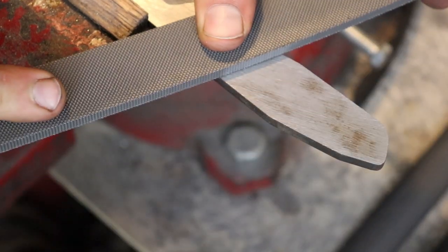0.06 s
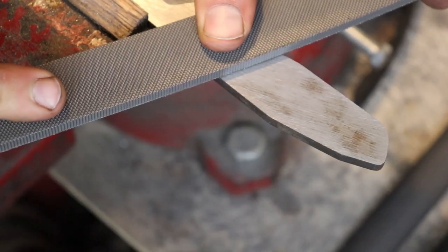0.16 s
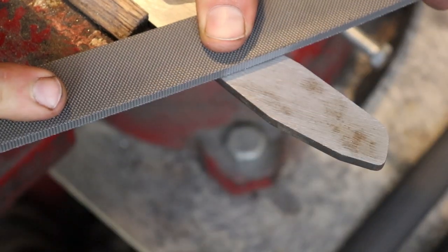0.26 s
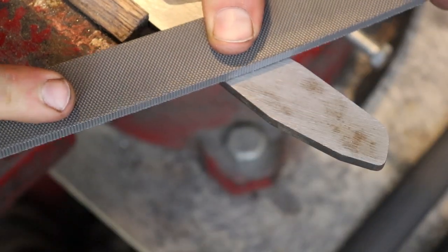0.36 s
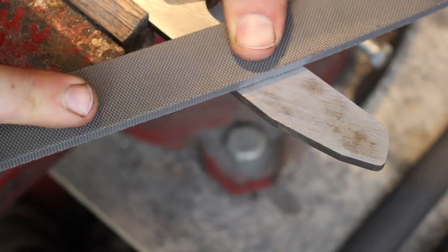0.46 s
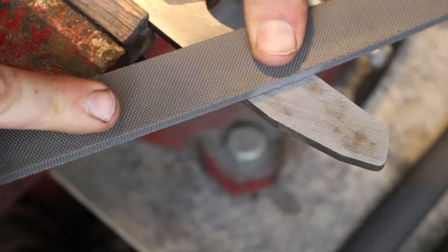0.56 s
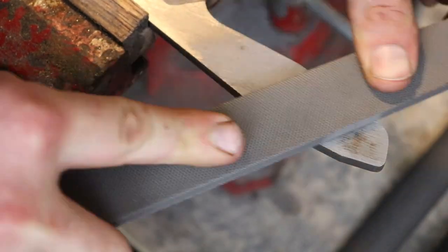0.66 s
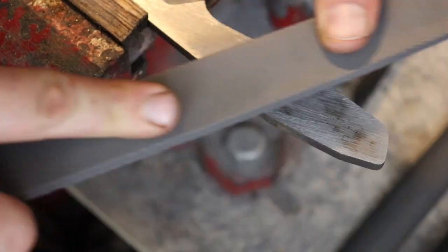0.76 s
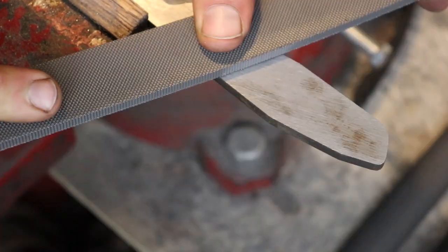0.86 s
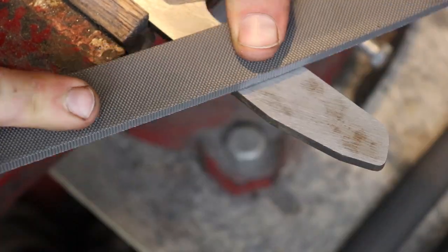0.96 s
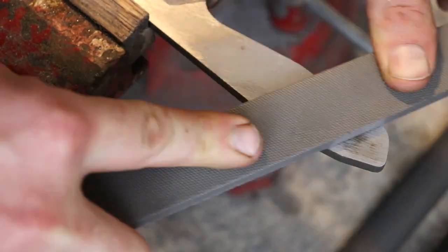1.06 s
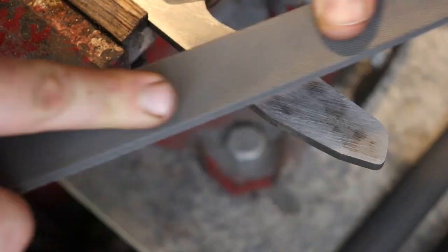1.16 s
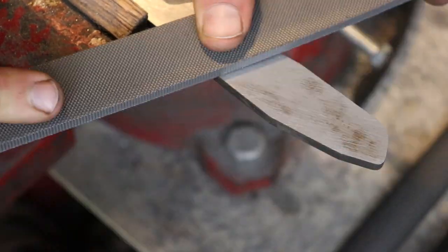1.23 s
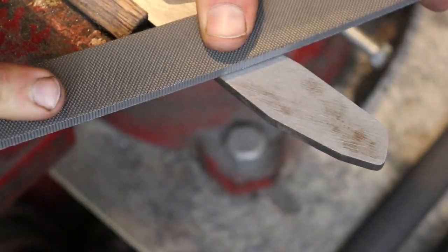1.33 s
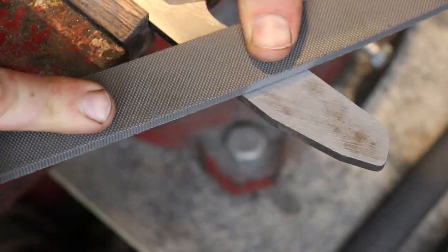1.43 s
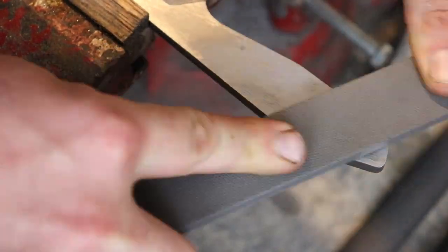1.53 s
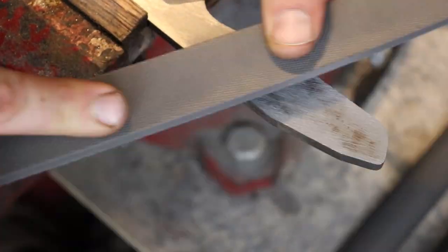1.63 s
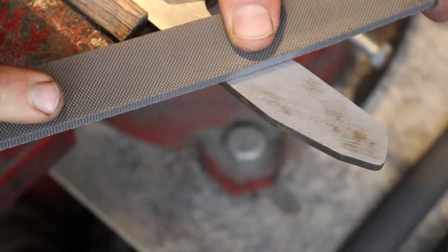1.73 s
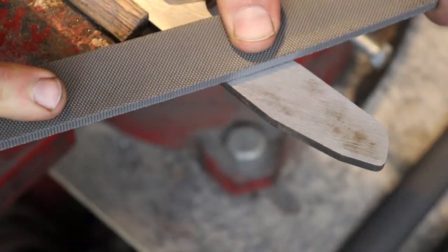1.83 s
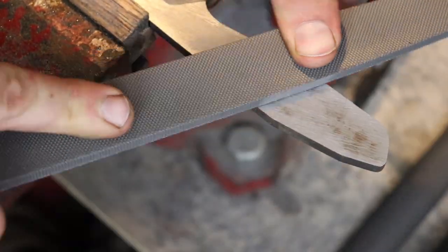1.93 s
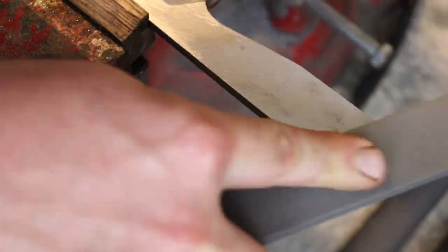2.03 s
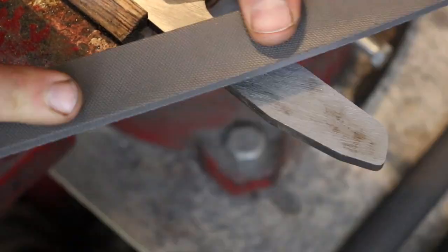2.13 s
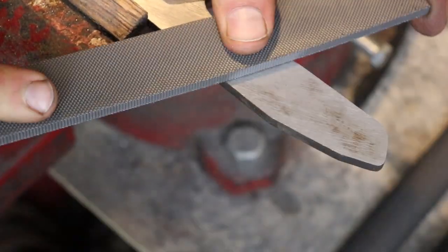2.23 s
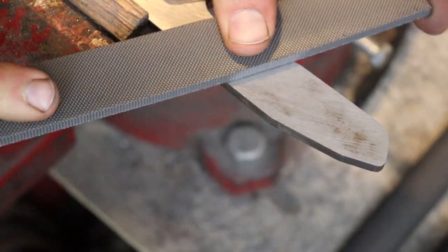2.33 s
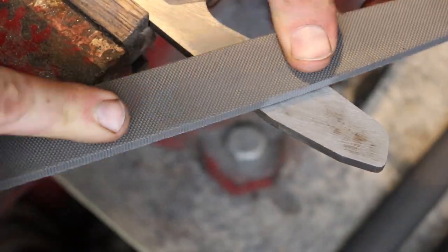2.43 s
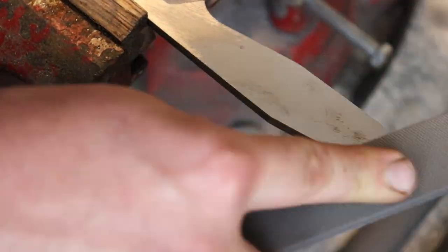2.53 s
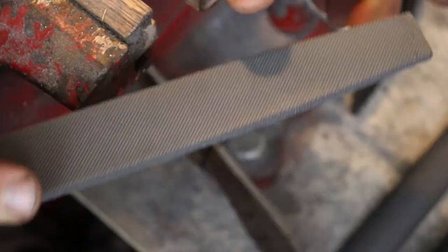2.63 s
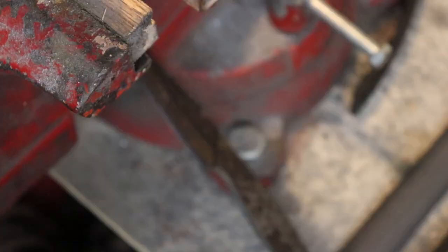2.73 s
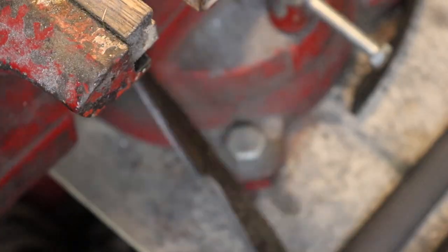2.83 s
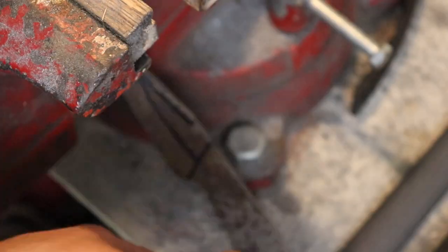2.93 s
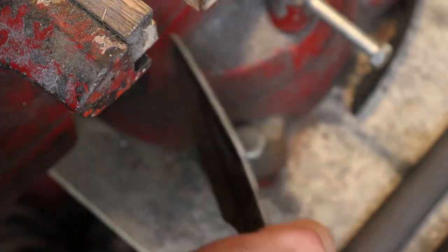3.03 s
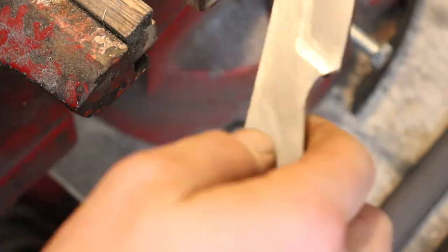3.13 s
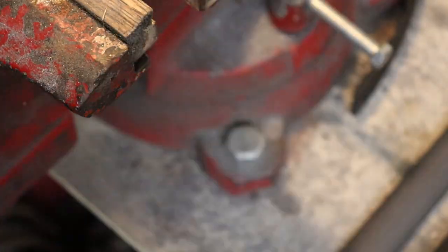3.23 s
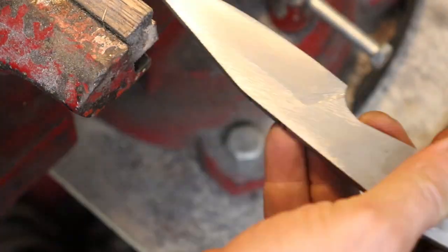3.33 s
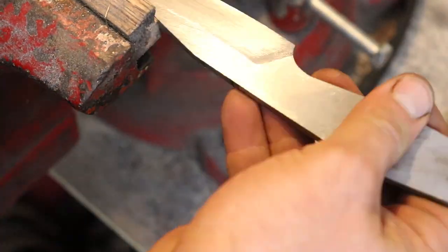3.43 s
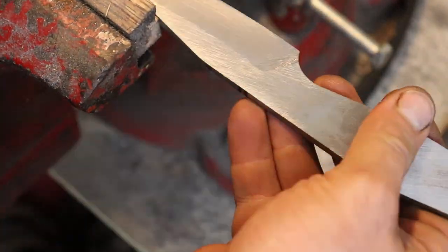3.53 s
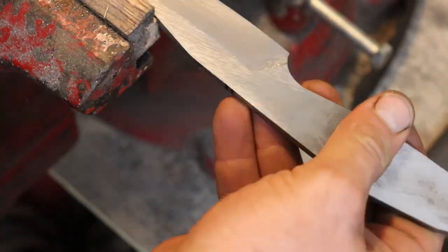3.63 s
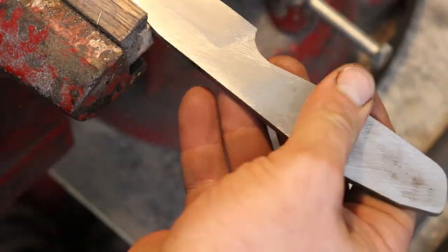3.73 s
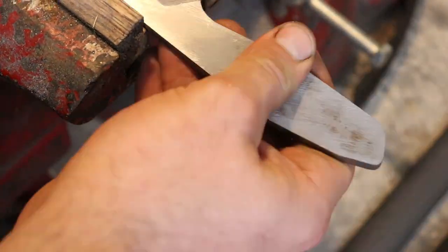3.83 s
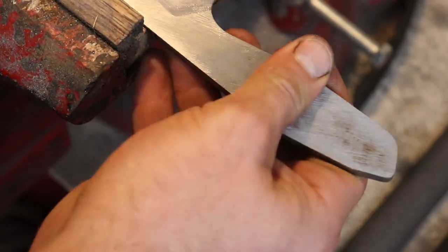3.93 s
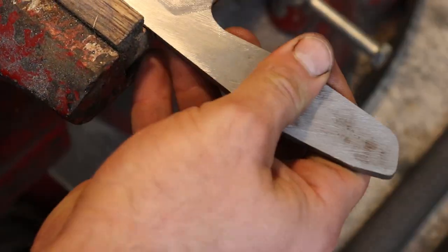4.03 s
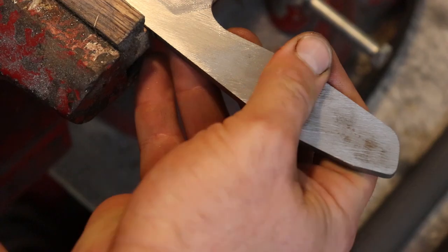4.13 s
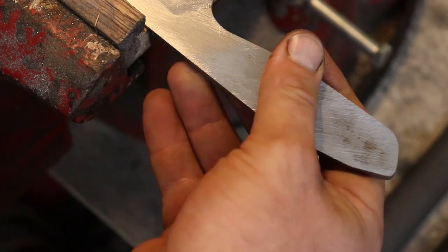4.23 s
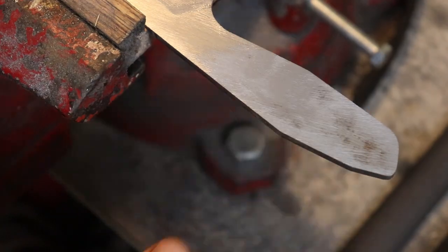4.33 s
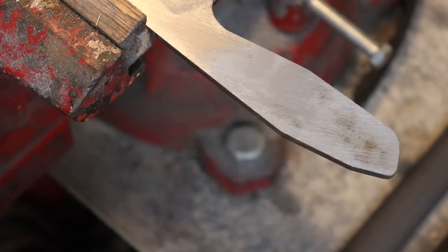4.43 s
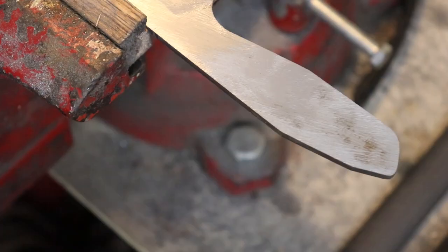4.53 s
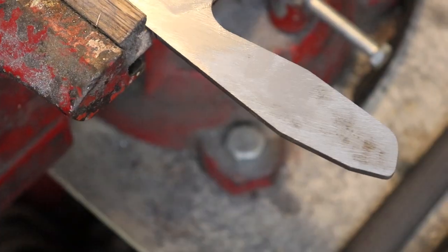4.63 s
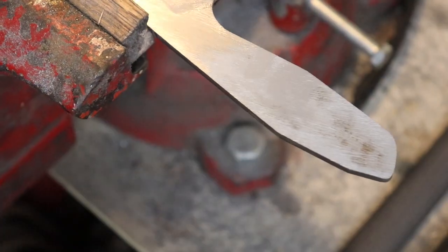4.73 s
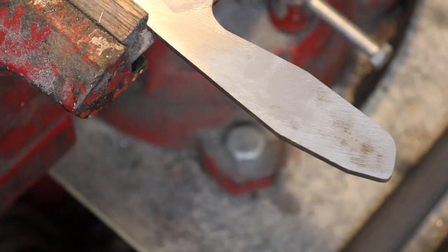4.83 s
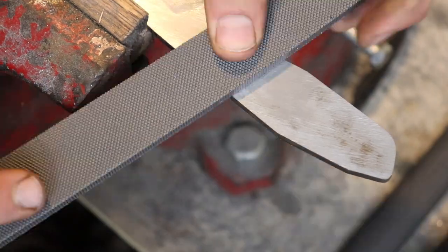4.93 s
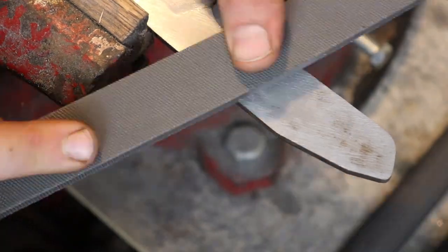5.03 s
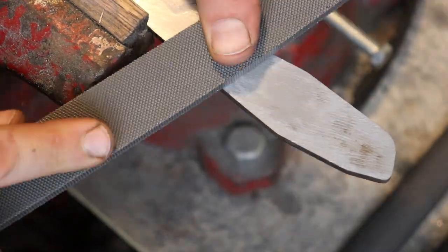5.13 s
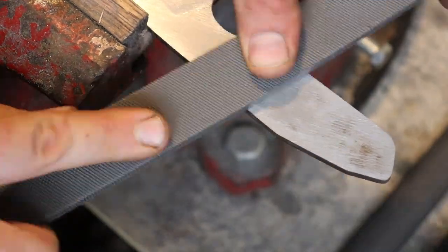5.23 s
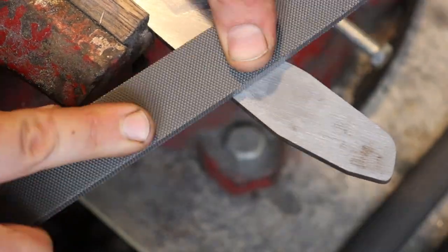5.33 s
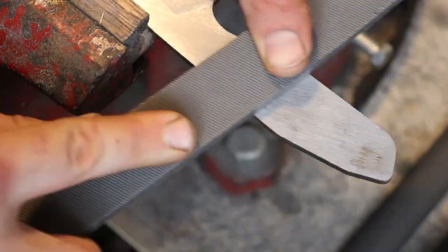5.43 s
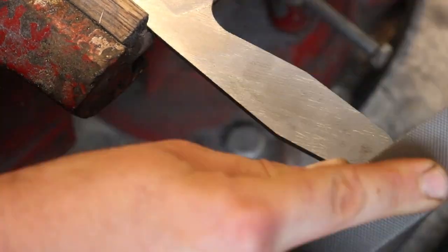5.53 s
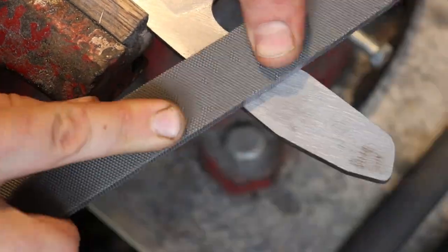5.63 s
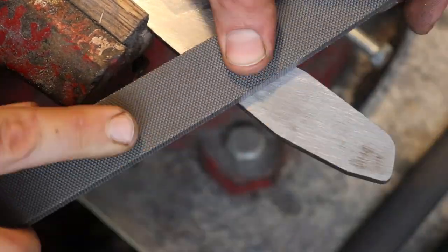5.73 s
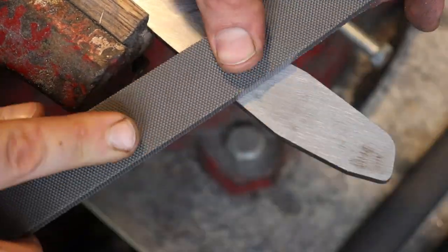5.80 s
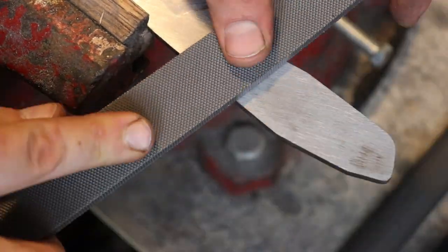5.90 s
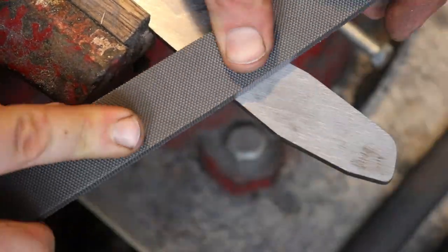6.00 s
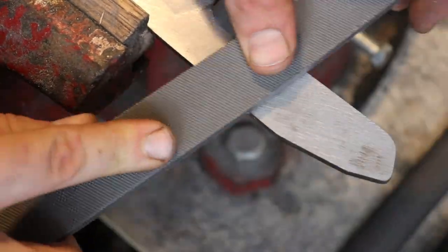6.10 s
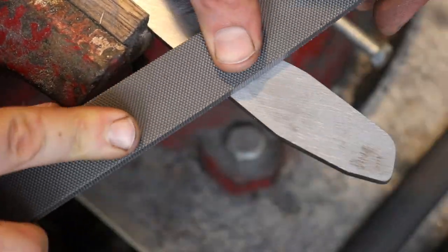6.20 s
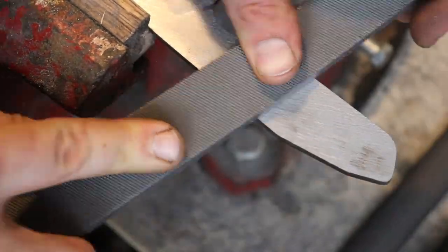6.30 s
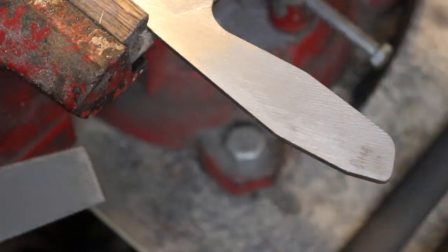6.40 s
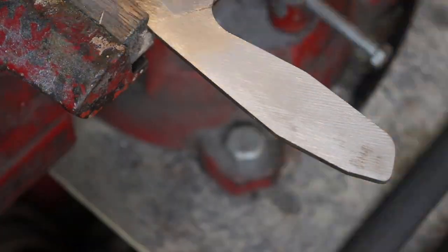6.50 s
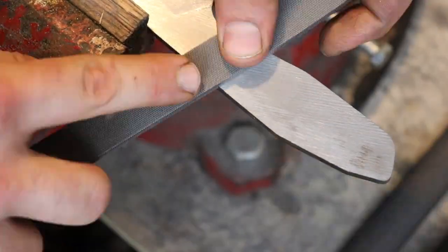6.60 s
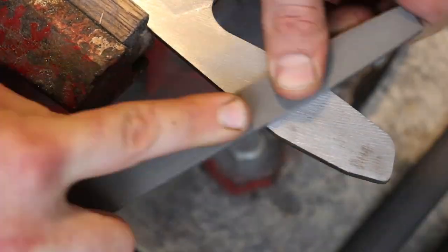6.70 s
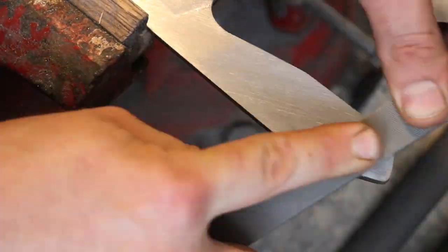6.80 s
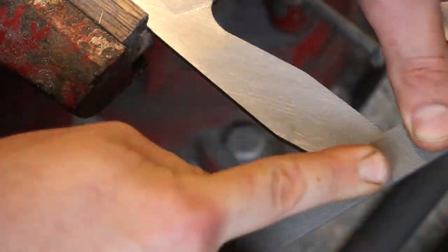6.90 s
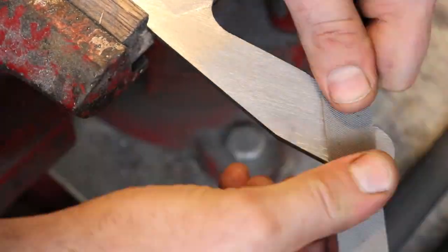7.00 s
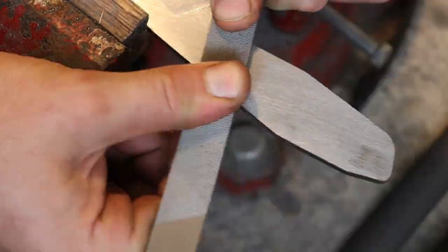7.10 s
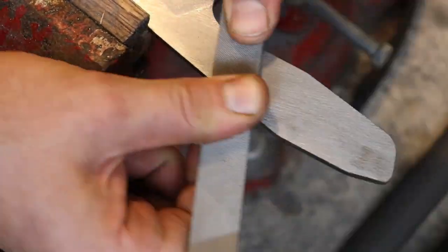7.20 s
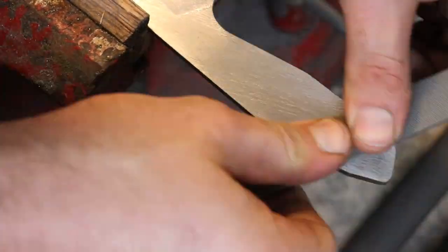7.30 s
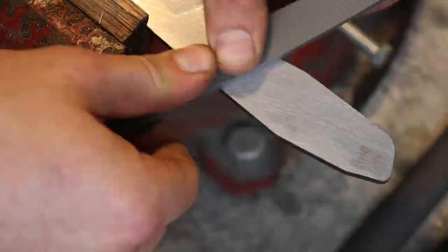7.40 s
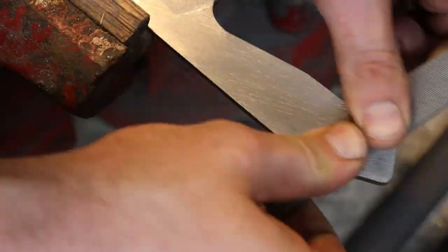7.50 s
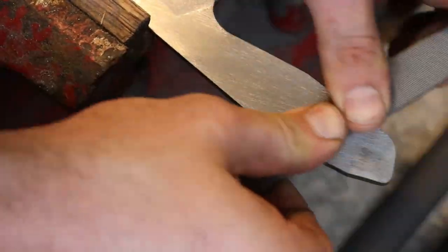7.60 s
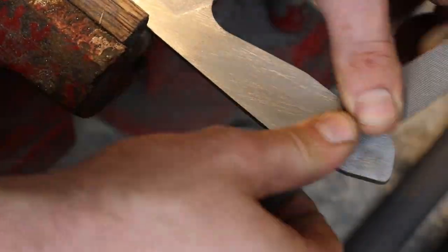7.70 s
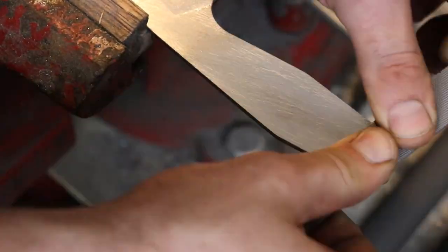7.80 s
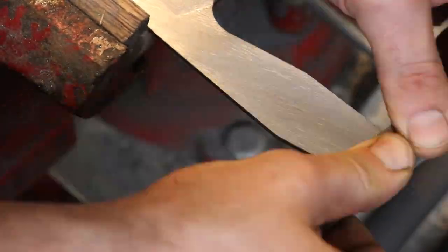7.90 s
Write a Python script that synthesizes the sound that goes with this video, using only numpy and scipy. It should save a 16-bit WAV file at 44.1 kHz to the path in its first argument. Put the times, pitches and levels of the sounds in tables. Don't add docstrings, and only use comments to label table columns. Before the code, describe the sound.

Close stereo pickup of time-lapse metal filing, with short room reflections and very soft background hush. A rasping stroke at ordinary pace jumps to brisk, ringing scrapes with set-down taps. Loud steel knocks and scrapes mark the blade being turned and seated in the vise, much louder than the filing. Finally the strokes become racing, thin, high-pitched chirps, first scattered, then in fluttering runs until the end.

```python
import sys
import numpy as np
from scipy import signal
from scipy.fft import rfft, irfft, next_fast_len
from scipy.io import wavfile
from scipy.ndimage import uniform_filter1d

SR = 44100
rng = np.random.default_rng(int(sys.argv[2]) if len(sys.argv) > 2 else 0)


def persist_wave(psi):
    counts = np.round(np.clip(psi, -1, 1) * 32767).astype(np.int16)
    wavfile.write(sys.argv[1], SR, np.atleast_2d(counts).T)


def elevation(decibels):
    levels = np.asarray(decibels, float)
    return 10 ** (levels / 20)


N = 350595
TIME = np.arange(N) / SR
QUICK_S, RACING_S = 0.698, 4.8

# (frequency [Hz], width [Hz], level over the colour [dB])
LOOSE_STEEL = [
    [(300, -38.5), (650, -15.5), (1100, -13.5), (1800, -9), (3500, -7.5), (6000, -9), (11000, -11), (16000, -15.5)],
    [(1850, 130, 2), (3120, 130, 3), (5650, 83, 4), (14000, 300, 1.5)],
]
RACING_STEEL = [
    [(530, -50), (900, -44), (1800, -26), (2330, -36.5), (3000, -22), (3800, -28.5), (6300, -21), (8300, -14), (9400, -17.5), (16000, -12.5)],
    [(1380, 58, 7), (2655, 150, 8.5), (3250, 246, 10.5), (4500, 450, 0.8), (6520, 56, -2.5), (8940, 240, 6.5), (7700, 280, -8.5), (9800, 220, 14), (10400, 265, 13), (11000, 80, 3.5), (12100, 140, 1), (12000, 120, -3), (13000, 490, 3)],
]


def strokes():
    # (frequency [Hz], width [Hz], level over the colour [dB])
    natural_steel = [
        [(59, -44), (90, -9), (125, 4.5), (175, -13), (289, -8), (350, -3), (442, -19.5), (513, -9), (1280, -18.5), (1580, -13), (8110, -26.5), (11000, -27.5), (12300, -36), (16000, -39)],
        [(347, 135, 11.5), (501, 15, 13.5), (4970, 240, 3), (5500, 200, -8), (8170, 460, 5), (2030, 150, -6), (3500, 160, 2)],
    ]
    quick_steel = [
        [(180, -69.5), (300, -18), (470, -17), (624, -6), (946, -16), (1750, -6), (2250, -10.5), (2570, -10.5), (4300, -16), (6200, -15), (9710, -13.5), (16000, -12.5)],
        [(636, 39, 6.5), (2610, 160, 2), (3200, 140, -1), (7660, 240, 0), (9800, 500, 2)],
    ]
    # (file touches [s], teeth bite [s], file lifts [s], bite level [dB], crest level [dB])
    full_strokes = [
        (0.441, 0.484, 0.677, -46, -45.5),
        (.6, 0.69, 0.786, -46, -42.5),
    ]
    # (time [s], effort [dB], sizzle against the rasp [dB])
    quick_pushes = [
        [(1.026, -70, -14), (1.044, -46.5, -1.5), (1.09, -44, -2), (1.132, -45.5, -3), (1.166, -43, 3),
         (1.192, -41.5, 5), (1.26, -80, 2)],
        [(1.44, -70, -17), (1.46, -52, -4), (1.524, -51.5, -5), (1.538, -44.5, -4.5), (1.636, -42.5, 4),
         (1.666, -45, 1), (1.72, -83, -3)],
        [(1.93, -85, -11), (1.944, -62.5, -7), (1.982, -43, -2), (2.01, -59, -8), (2.024, -45, 0.5),
         (2.128, -40, 1.5), (2.192, -75, 2.5), (2.2, -74, 1.5)],
        [(2.42, -82, -20), (2.442, -53.5, -3), (2.516, -49, -2.5), (2.554, -40.5, 0.5), (2.588, -40, 2),
         (2.616, -41, 1.5), (2.63, -62, 4.5), (2.646, -54, -2.5)],
    ]
    snag_scrapes = [
        (1.016, -54, 6.4, 4, -7),
    ]
    slide_scrapes = [(2.708, -28.5, 1.4, 26, 1), (2.746, -27, 23, 15, -4), (2.833, -52, 15, 18, 14),
                     (2.916, -57, 2.62, 14, -27), (2.947, -47, 34, 7.3, -14.5), (3.03, -47.5, 19, 37, -3),
                     (3.079, -29, 1.3, 3.1, -15), (3.101, -30, 6.8, 15.3, -23), (3.157, -67, 7.3, 13, 14),
                     (3.211, -66.5, 1.5, 23, 14), (3.24, -65, 27, 21, 15.5)]
    seating_scrapes = [(3.66, -40.5, 2.9, 5.1, -11), (3.69, -61.5, 49, 390, -4), (3.845, -75, 17, 3, -32),
                       (4.022, -81, 7.4, 57, -24), (4.132, -56, 4.9, 23, -3), (4.18, -51, 15, 12.5, -16),
                       (4.532, -64.5, 8.4, 23, -13.5), (4.548, -52.5, 1.9, 29, 1),
                       (4.5985, -66, 1.3, 15, 27.5), (4.611, -67, 4.7, 20, 26), (4.668, -58, 6.4, 9.9, -18),
                       (4.705, -71.5, 6.8, 30, 12)]
    natural_sizzle, natural_drone = (-6.5, -8.5, -10.5, 24), (-4.5, -11.5, -3.5, 5)
    quick_sizzle, quick_drone = (-3.5, -4, 3.5, -3), (-12.5, -13, -12.5, -49)
    push_drone_db = -13.5

    def layers(rasp, low_hz, mid_hz, top_hz=5960):
        return [band(rasp, mid_hz, 5000), band(rasp, top_hz, 17000), band(rasp, low_hz, mid_hz)]

    first = teeth(natural_steel, per_s=4000, spread_db=4.0, t60=0.042, same=0.81, spot_s=0.054)
    quick = teeth(quick_steel, per_s=10000, spread_db=3.5, t60=0.081, same=0.75, spot_s=0.04)
    loose = teeth(LOOSE_STEEL, per_s=5000, spread_db=3, t60=0.04, same=0.6, spot_s=0.05)

    slow_moves = [stroke(*full_strokes[0], natural_sizzle, natural_drone)]
    quick_moves = [stroke(*row, quick_sizzle, quick_drone) for row in full_strokes[1:]]
    quick_moves += [[(*row, push_drone_db) for row in push] for push in quick_pushes]
    quick_moves += scrapes(snag_scrapes, drone_db=-31)
    loose_moves = scrapes(slide_scrapes, drone_db=-68.5) + scrapes(seating_scrapes, drone_db=0)

    slow = played(slow_moves, layers(first, 76, 500))
    brisk = played(quick_moves, layers(quick, 420, 1290))
    handled = played(loose_moves, layers(loose, 460, 1200, 5300))
    return np.where(TIME < QUICK_S, slow, brisk) + handled


def stroke(touch, bite, lift, bite_db, crest_db, sizzle, drone):
    touch_s, bite_s, hold_s, lift_s = 0.0082, 0.0044, 0.011, 0.041
    silent_db, touch_db = -81, -58.5
    s = [touch - touch_s, touch + touch_s, bite - bite_s, bite,
         lift, lift + hold_s, lift + lift_s, lift + 2 * lift_s]
    db = [silent_db, touch_db, touch_db + 9, bite_db,
          crest_db, crest_db + 1.5, crest_db - 12, silent_db]
    phase = [0, 0, 0, 1, 2, 2, 3, 3]
    return np.transpose([s, db, np.take(sizzle, phase), np.take(drone, phase)])


def scrapes(rows, drone_db):
    out = []
    for s, db, rise_ms, fall_ms, sizzle in rows:
        start, end = s - rise_ms / 250, s + fall_ms / 250
        out.append([(start, db - 40, sizzle, drone_db),
                    (s, db, sizzle, drone_db),
                    (end, db - 40, sizzle, drone_db)])
    return out


def teeth(body, per_s, spread_db, t60, same, spot_s, count=6):
    catch = (rng.random(N) < per_s / SR) * rng.choice([-1, 1], N)
    catch = catch * elevation(spread_db * np.minimum(rng.exponential(1, N), 4))
    spot = (TIME / spot_s + 3 * rng.random(N)).astype(int) % count
    t = TIME[:SR // 8]
    rung = np.zeros((2, N))
    for k in range(count):
        modes = pair(len(t), same) * elevation(-60 * t / t60)
        modes = modes / np.linalg.norm(modes[0])
        rung += signal.oaconvolve((catch * (spot == k))[None], modes, axes=1)[:, :N]
    return coloured(rung + elevation(-4) * catch, steel(body))


def played(tables, layers):
    out = np.zeros((2, N))
    for rows in tables:
        s, db, *rest = np.transpose(rows)
        span = slice(round(s[0] * SR), round(s[-1] * SR))
        for layer, rel_db in zip(layers, [0, *rest]):
            out[:, span] += layer[:, span] * elevation(np.interp(TIME[span], s, db + rel_db))
    return out


def knocks():
    set_down = [
        (0.9043, -21.5, 3200, -8.5, 0.11),
        (1.307, -24.5, 3250, -9, 0.086),
        (1.7616, -16, 3160, -7.5, 0.14),
        (2.2567, -15, 3500, -4, 0.13),
    ]
    turned = [(2.6547, -2, 4250, -12, 0.049), (2.658, -2.5, 2270, -10.5, 0.16),
              (2.6957, -14.5, 9500, 4, 0.028), (2.7034, -6.5, 2430, -7, 0.021), (2.731, -17, 2900, 2, 0.04),
              (2.9125, -32.5, 2400, -23, 0.043), (2.945, -25, 2840, -8.5, 0.13),
              (2.988, -26, 2330, -30, 0.051), (3.0114, -11, 2870, -23, 0.02),
              (3.0155, -20, 3960, -25, 0.051), (3.0745, -27, 1800, -12, 0.11),
              (3.0958, -24.5, 5000, -13, 0.096), (3.153, -27, 4520, -4, 0.09)]
    clamped = [(3.4404, -19, 3920, -26, 0.13), (3.448, -15, 5300, -17, 0.12),
               (3.5919, -10, 3900, -16.5, 0.23), (3.6152, -10.5, 1700, -21.5, 0.11),
               (3.647, -12.5, 2000, -14.5, 0.077), (3.684, -21, 1930, -9.5, 0.18),
               (3.739, -33, 1910, -31, 0.25), (3.8609, -8, 5340, -4.5, 0.095),
               (4.024, -38, 1230, -14, 0.095), (4.1237, -27.5, 5640, -10, 0.045),
               (4.154, -32, 2550, -24, 0.059), (4.178, -34.5, 1250, -44, 0.05), (4.701, -30, 7280, -5, 0.1)]
    more_knocks = [(2.808, -28.5, 2450, -22, 0.071), (2.866, -39, 2300, -22, .05),
                   (2.872, -33.5, 2190, -45, 0.063), (3.803, -37.5, 3330, -24, 0.16),
                   (3.837, -32.5, 1830, -49, 0.16), (4.049, -45.5, 2640, -34.5, .06),
                   (3.381, -44, 1820, -19, 0.29), (3.56, -39, 6000, -10, 0.016), (4.739, -42, 12000, 5, .02),
                   (2.9242, -36, 2330, -33, .04), (4.5472, -35, 1500, -5, .05), (4.663, -54, 1203, -27, .05)]
    # (frequency [Hz], level [dB], t60 [s])
    blade_modes = [(665, -12, 0.052), (1820, 0.5, 0.07), (2430, -20, 0.073), (2690, 4, 0.081),
                   (3330, -5.5, 0.036), (4780, 9.5, 0.067), (5500, 6.5, 0.022)]
    out, t = np.zeros((2, N + SR)), TIME[:SR // 3]
    floor = signal.butter(3, 450, "high", fs=SR, output="sos")

    def decay(t60):
        return elevation(-60 * t / 0.017) + elevation(-1.0 - 60 * t / np.clip(t60, 0.015, 0.3))

    for s, db, ring_hz, treble_db, t60 in set_down + turned + clamped + more_knocks:
        tilt = lambda hz: elevation((treble_db + 12.0) / (1 + (6500 / (hz + 1)) ** 6))
        bump = lambda hz: 1 + elevation(6.5) / (1 + ((hz - ring_hz) / (0.045 * ring_hz)) ** 2)
        rattle = pair(len(t), 0.78)
        rattle = evened(coloured(rattle, lambda hz: steel(LOOSE_STEEL)(hz) * tilt(hz) * bump(hz)))
        dull = coloured(rattle, lambda hz: 1 / (1 + (hz / 7000) ** 6))
        knock = dull * decay(t60) + (rattle - dull) * decay(0.8 * t60)

        click = 1. * (t == t[12])
        snap = coloured(click, lambda hz: steel(LOOSE_STEEL)(hz) * tilt(hz) * tilt(hz / 1.6) ** 0.3)
        knock = knock + elevation(27.0) * snap * (t < 0.01)

        luck = rng.standard_normal((len(blade_modes), 3))
        for (hz, mode_db, ring_s), (size, shift, side) in zip(blade_modes, luck):
            near = min(tilt(hz), 1 / tilt(hz)) / (1 + (np.log(hz / ring_hz) / 0.8) ** 2)
            turn = 2 * np.pi * hz * (1 + 0.021 * shift) * t + 0.5 * side * np.array([[-1], [1]])
            beats = evened(uniform_filter1d(rng.standard_normal(len(t)), 130))
            fade = elevation(mode_db - 17.5 - 60 * t / ring_s)
            knock = knock + elevation(2 * size) * near * fade * np.sin(turn) * beats

        knock = signal.sosfilt(floor, knock)
        out[:, round(s * SR):][:, :len(t)] += elevation(db - 3.0) * knock / abs(knock.mean(0)).max()
    return out[:, :N]


def pings():
    # (time [s], frequency [Hz], level [dB], t60 [s])
    clear_modes = [(.797, 3554, -36, 0.05), (.8, 7660, -46, 0.067), (1.652, 3600, -38.5, 0.087),
                   (1.66, 5500, -41, 0.074), (1.762, 7220, -37, 0.026), (1.762, 5500, -35, .03),
                   (2.257, 7865, -40, 0.049), (2.257, 9720, -35.5, 0.021), (2.6585, 7920, -7.5, .012),
                   (2.6555, 2793, -22.5, 0.038), (2.6555, 1503, -37, .04), (2.696, 9380, -32, 0.24),
                   (2.7035, 2400, -7, 0.0079), (2.7035, 4470, -18, 0.016), (2.7035, 6340, -11, 0.011),
                   (2.7035, 10160, -13, 0.0074), (2.745, 6400, -25.5, 0.062), (2.7315, 1716, -19, 0.018),
                   (2.7315, 5370, -16.5, 0.012), (2.988, 1490, -37, 0.028), (3.0118, 4940, -20, 0.035),
                   (3.024, 3406, -39, 0.054), (3.0118, 1844, -35, 0.11), (3.0118, 664, -48, 0.17),
                   (3.0118, 3407, -59, 1.5), (3.075, 1796, -26, 0.03), (3.078, 2500, -26.5, 0.02),
                   (3.0958, 4980, -25, 0.031), (3.099, 7130, -31, 0.025), (3.098, 682, -49.5, 0.12),
                   (3.099, 14000, -55, 0.033), (3.448, 5180, -25, .03), (3.448, 5910, -33.5, 0.1),
                   (3.448, 2070, -32.5, 0.047), (3.448, 14100, -35, .015), (3.5915, 3950, -22, 0.039),
                   (3.5915, 5570, -19, 0.012), (3.606, 14200, -49, .03), (3.616, 14450, -24, 0.0184),
                   (3.616, 7840, -40.5, 0.067), (3.633, 14300, -27, 0.013), (3.682, 14400, -28, .015),
                   (3.86, 5540, -26, 0.041), (3.86, 1890, -34, 0.073), (4.124, 14300, -48, .03),
                   (4.147, 14200, -35.5, 0.024), (4.156, 14300, -52, 0.033), (4.024, 1240, -49, 0.066),
                   (4.088, 1800, -55, 0.039)]
    # (time [s], level [dB])
    vise_thuds = [
        (0.9027, -54.5),
        (1.3065, -48.5),
        (1.762, -48),
        (2.257, -46.5),
        (2.655, -38),
        (3.448, -44),
        (3.861, -45),
    ]
    thud_hz, thud_t60 = 653, 0.05
    out, t = np.zeros((2, N + SR)), TIME[:SR // 2]
    for s, hz, db, t60 in clear_modes + [(s, thud_hz, db, thud_t60) for s, db in vise_thuds]:
        smooth = max(int(SR * t60 / 16), 30)
        a, b = uniform_filter1d(rng.standard_normal((2, len(t))), smooth, axis=1)
        beats = 1 + 0.9 * (evened(a) + 1j * evened(b)) * np.minimum(t / 0.006, 1)
        side = 1.5 * (rng.random() - 0.5) * np.array([[-1], [1]])
        turn = np.exp(2j * np.pi * hz * t + 1j * side)
        shape = np.minimum(t / 0.00053, 1) * elevation(db - 60 * t / max(t60, 0.008))
        out[:, round(s * SR):][:, :len(t)] += (turn * beats).imag * shape
    return signal.sosfilt(signal.butter(4, 480, "high", fs=SR, output="sos"), out[:, :N])


def singing(x):
    # (frequency [Hz], level [dB])
    file_modes = [
        (3460, -22),
        (5700, -24),
        (5950, -24),
        (7800, -23),
    ]
    t60 = 0.18
    r = np.exp(-np.log(1000) / (t60 * SR))
    out = 0 * x
    for hz, db in file_modes:
        resonator = [1, -2 * r * np.cos(2 * np.pi * hz / SR), r * r]
        out = out + elevation(db) * signal.lfilter([10 * (1 - r)], resonator, x)
    return out


def chirps():
    file = teeth(RACING_STEEL, per_s=12000, spread_db=2.5, t60=0.009, same=0.7, spot_s=0.05, count=8)
    file = patchy(evened(file), [0, 2330, 3800, 6300, 9400, SR], spread_db=1.2, hold_s=0.006)
    file = evened(coloured(file, dead_bands))
    effort = np.sqrt(elevation(-0.5) * flicks() + runs())
    return file * effort + taps() + pops()


def flicks():
    # (crest [s], crest level [dB], rise over 10 dB [ms], fall over 10 dB [ms])
    lone_strokes = [(4.909, -31.5, 5.7, 13.2), (4.943, -39.5, 3, 3.6), (5.013, -38.5, 5.4, 2.5),
                    (5.097, -43, 10.3, 18), (5.176, -40.5, 12, 11.4), (5.609, -41, 8.5, 8),
                    (5.624, -39, 7.2, 4.6), (5.68, -39.5, 9.2, 4.2), (5.692, -40, 9, 4.8),
                    (5.722, -40.5, 22, 13), (5.78, -40, 23, 10.5), (5.868, -37.5, 22, 4),
                    (5.937, -45, 8.7, 4.2), (5.961, -40.5, 23, 8.1), (6.029, -38, 7.6, 13),
                    (6.1, -38.5, 3, 15.6), (6.169, -38.5, 2.5, 15), (6.246, -38, 8, 12.4),
                    (6.322, -40, 13, 10.7), (6.402, -40, 12.4, 13), (6.555, -47, 1.96, 3),
                    (7.013, -42, 3.4, 2), (7.053, -53, 2.6, 6)]
    power = np.zeros(N + SR)
    before = 1000
    t_ms = (np.arange(2600) - before) / SR * 1000
    for s, db, rise_ms, fall_ms in lone_strokes:
        edge = np.where(t_ms < 0, (abs(t_ms) / rise_ms) ** 3, (abs(t_ms) / fall_ms) ** 3.4)
        power[round(s * SR) - before:][:len(t_ms)] += elevation(2 * (db - 10 * edge))
    return power[:N]


def runs():
    # (time [s], effort [dB], push over pull [dB])
    run_tables = [
        [(5.285, -48.5, 10), (5.356, -43.5, -7), (5.404, -46.5, 8.5), (5.52, -46.5, 3.5), (5.575, -48.5, -11.5)],
        [(6.73, -44.5, 6), (6.894, -43.5, -6), (6.945, -43.5, 3), (7.007, -43, -1)],
        [(7.09, -42.5, -6), (7.123, -43.5, 2.5), (7.216, -43.5, -1.5), (7.279, -41, -4), (7.315, -41, 13)],
        [(7.383, -45.5, 3), (7.527, -41.5, 1), (7.585, -43.5, 1), (7.653, -42, 5.5), (7.737, -41, -1),
         (7.806, -43.5, 1), (7.857, -44, -9.5), (7.896, -41.5, 2.5), (7.95, -42, 0)],
    ]
    strokes_made = [
        (0, 3, 5, 10, 12),
        (0, 9, 12, 16),
        (0, 2, 8, 12, 14),
        (0, 7, 10, 14, 19, 24, 28, 31, 34),
    ]
    run_leans = [0.00078, 0.2, 0.46, 0]
    uneven_db, drag_db = 0.7, -17
    power = np.zeros(N)
    for rows, made, lean in zip(run_tables, strokes_made, run_leans):
        s, effort_db, push_db = np.transpose(rows)
        turn = np.interp(TIME, s, made)
        k, u = turn.astype(int), turn % 1
        way = (-1.) ** k
        effort = np.interp(turn, made, effort_db)
        db = effort + way * np.interp(k, made, push_db) / 2 + uneven_db * rng.standard_normal(64)[k]
        arch = np.sin(np.pi * u) ** 1.7 * np.exp(way * 2 * lean * (u - 0.5))
        inside = np.clip(2 * np.minimum(turn - made[0], made[-1] - turn), 0, 1)
        power += inside * (elevation(2 * (db + 3.5)) * arch + elevation(2 * (effort + drag_db)))
    return power


def patchy(x, edges_hz, spread_db, hold_s):
    out, hop = 0 * x, 64
    for low, high in zip(edges_hz, edges_hz[1:]):
        wander = rng.standard_normal(N // hop + 1)
        wander = evened(uniform_filter1d(wander, int(hold_s * SR / hop)))
        swell = np.interp(TIME, np.arange(len(wander)) * hop / SR, wander)
        out = out + coloured(x, lambda hz: 1. * (hz >= low) * (hz < high)) * elevation(spread_db * swell)
    return out


def dead_bands(hz):
    # (frequency [Hz], width [Hz])
    dips = [
        (3800, 270),
        (5550, 200),
        (9450, 230),
        (13350, 330),
    ]
    gain = np.ones_like(hz)
    for f, width in dips:
        gain = gain * (1 - 0.49 / (1 + (2 * (hz - f) / width) ** 2))
    return gain


def taps():
    # (time [s], peak level [dB], ring [Hz], relative treble [dB])
    racing_taps = [(4.834, -34.5, 4520, -8), (4.856, -42.5, 8900, -6), (4.8602, -27.5, 5030, -7.5),
                   (4.8935, -26, 8650, -8), (4.9982, -35.5, 9500, -6), (5.03, -30.5, 9700, -3),
                   (5.1307, -36, 13000, -15), (5.2, -36.5, 9800, -11), (5.229, -37, 9600, -8),
                   (5.332, -29, 9000, -2), (5.3715, -26, 9000, 4), (5.529, -27, 9900, 8),
                   (5.8079, -31, 10200, -14), (7.682, -29.5, 10000, -5), (5.644, -34.5, 10400, -18),
                   (5.731, -30.5, 9000, -13), (5.891, -40, 9940, -16.5), (5.9867, -30.5, 3240, 1),
                   (6.057, -42, 3350, 1), (6.1286, -30.5, 9200, 12), (6.197, -42, 10400, 4),
                   (6.2673, -28.5, 9900, 5), (6.348, -44, 3360, 1), (6.3797, -43, 13500, 6),
                   (6.45, -47.5, 13500, 17), (6.469, -52, 3200, -14), (6.488, -48, 5000, -20),
                   (6.5392, -26.5, 6000, -3), (6.548, -22, 13800, 12), (6.551, -22.5, 11900, 17),
                   (6.563, -40, 12650, 3), (6.594, -30, 9900, -2), (6.667, -43.5, 10030, -1),
                   (7.0183, -25, 10400, -8), (7.032, -38, 10400, 2), (7.3432, -45.5, 9860, -9)]
    lag_s, snap_t60, tail_t60, tail_db = 0.0011, 0.004, 0.028, -8
    out, t = np.zeros((2, N + SR)), TIME[:SR // 16]
    decay = elevation(-60 * t / snap_t60) + elevation(tail_db - 60 * t / tail_t60)
    for s, db, ring_hz, treble_db in racing_taps:
        tilt = lambda hz: elevation(8 + (treble_db - 4) / (1 + (7500 / (hz + 1)) ** 4))
        floor = lambda hz: 1 / (1 + (2400 / (hz + 1)) ** 8)
        bump = lambda hz: 1 + elevation(7.0) / (1 + ((hz - ring_hz) / 400) ** 2)
        gain = lambda hz: steel(RACING_STEEL)(hz) * tilt(hz) * floor(hz) * bump(hz)
        tap = coloured(pair(len(t), 0.86), gain) * np.minimum(t / 0.000296, 1) * decay
        out[:, round((s + lag_s) * SR):][:, :len(t)] += elevation(db + 0.5) * tap / abs(tap.mean(0)).max()
    return out[:, :N]


def pops():
    # (time [s], thump level [dB], width [ms], snap level [dB], snap frequency [Hz])
    pop_rows = [
        (4.9107, -33, 0.12, -15.5, 9000),
        (2.6975, -44, .5, -60, 2750),
        (2.6958, -60, .12, -17, 9500),
        (6.5525, -70, .12, -17, 12000),
    ]
    out = np.zeros(N)
    for s, db, width_ms, snap_db, hz in pop_rows:
        t = TIME - s
        snap = elevation(snap_db) * np.sin(2 * np.pi * hz * t)
        out += (elevation(db) + snap) * np.exp(-(t * 1000 / width_ms) ** 2)
    return out


def echoes(x, t60, delay_s):
    t = TIME[:SR // 2]
    tail = pair(len(t), 0.25) * elevation(-60 * t / t60) * (t > delay_s)
    tail = coloured(tail, lambda hz: 1 / (1 + (hz / 9000) ** 2))
    tail = tail / np.linalg.norm(tail[0])
    ring = lambda part: signal.oaconvolve(part[None], tail, axes=1)[:, :len(part)]
    cut = round(QUICK_S * SR)
    mono = x.mean(0)
    return np.hstack([ring(mono[:cut]), ring(mono[cut:])])


def hush():
    # (frequency [Hz], level [dB per Hz])
    hush_colours = [
        [(15, -33), (25, -5), (405, -8.5), (1190, -12.5), (1370, -13), (2220, -18), (16000, -26.5)],
        [(25, -25.5), (130, -3.5), (300, -2.5), (1100, -8.5), (2400, -11.5), (5000, -15), (16000, -20.5)],
        [(25, -35), (320, -10.5), (640, -3), (4000, -3), (8000, -5.5), (16000, -2)],
    ]
    # (time [s], level [dB])
    hush_levels = [
        (0, -58.5),
        (.15, -61.5),
        (.69, -63.5),
        (.7, -65),
        (4.79, -63.5),
        (4.8, -61.5),
    ]
    pace = np.searchsorted([QUICK_S, RACING_S], TIME)
    out = np.zeros((2, N))
    for k, colour in enumerate(hush_colours):
        air = evened(coloured(pair(N, 0.025), lambda hz: elevation(read(colour, hz))))
        out += (pace == k) * air
    return out * elevation(np.interp(TIME, *np.transpose(hush_levels)))


def steel(body):
    colour, rings = body

    def gain(hz):
        ringing = sum(elevation(db) / (1 + (2 * (hz - f) / width) ** 2) for f, width, db in rings)
        return elevation(read(colour, hz)) * (1 + ringing)
    return gain


def pair(size, same):
    shared, left, right = rng.standard_normal((3, size))
    same = np.clip(same, 0, 1)
    return np.sqrt(same) * shared + np.sqrt(1 - same) * np.array([left, right])


def band(x, low_hz, high_hz):
    def gain(hz):
        return 1 / np.sqrt((1 + (low_hz / (hz + 1)) ** 12) * (1 + (hz / high_hz) ** 12))
    return evened(coloured(x, gain))


def coloured(x, gain):
    size = next_fast_len(x.shape[-1])
    spectrum = rfft(x, size) * gain(np.fft.rfftfreq(size, 1 / SR))
    return irfft(spectrum, size)[..., :x.shape[-1]]


def read(points, hz):
    f, value = np.transpose(points)
    return np.interp(np.log(hz + 1), np.log(f + 1), value)


def evened(x):
    return x / np.sqrt(np.mean(x ** 2) + 1e-20)


def scene():
    slow = strokes() + knocks() + pings()
    slow = slow + singing(slow)
    fast = chirps()
    slow_echoes = elevation(-14.5) * echoes(slow, t60=0.18, delay_s=0.011)
    fast_echoes = elevation(-17.5) * echoes(fast, t60=0.051, delay_s=0.0045)
    return slow + slow_echoes + fast + fast_echoes + hush()


def band_limit(x):
    return signal.sosfilt(signal.butter(12, 17050, fs=SR, output="sos"), x)


def record(dry):
    edge_hz, slope_hz = 15840, 45

    def band_edge(hz):
        return elevation(-36 / (1 + np.exp(np.clip((edge_hz - hz) / slope_hz, -50, 50))))
    mix = coloured(dry, band_edge)
    return band_limit(mix)


dry = scene()
out = record(dry)
persist_wave(out)
```